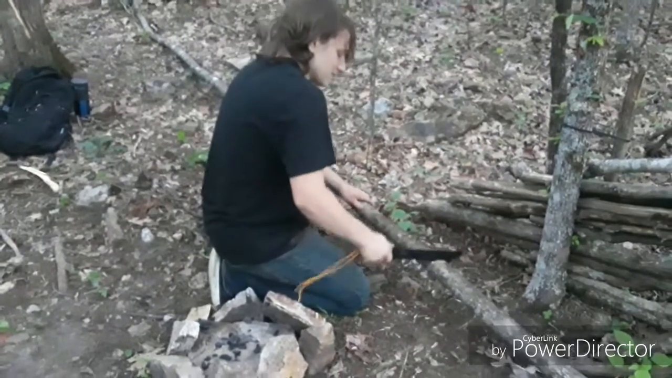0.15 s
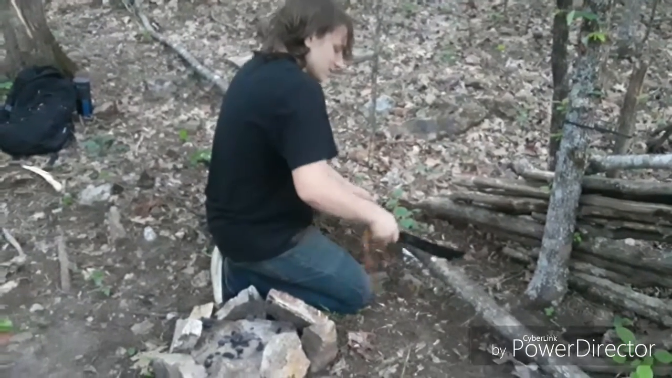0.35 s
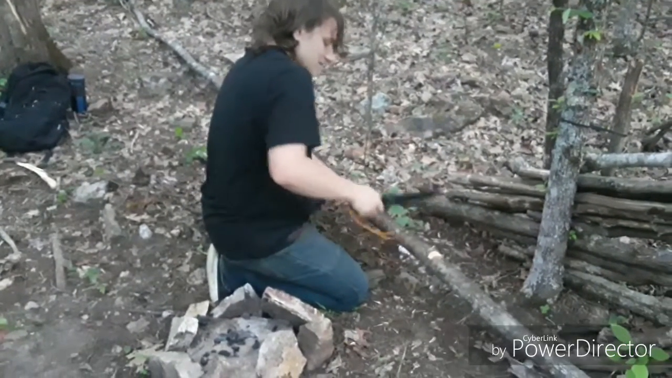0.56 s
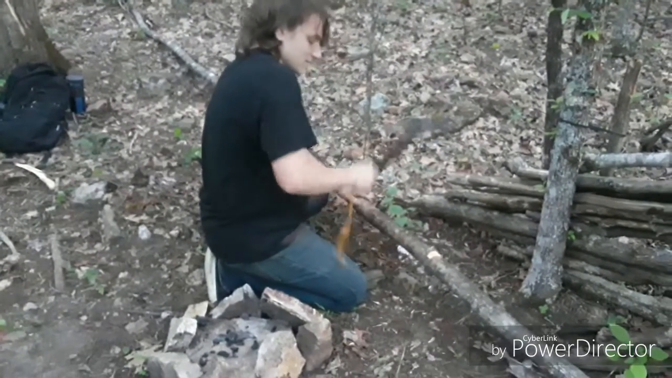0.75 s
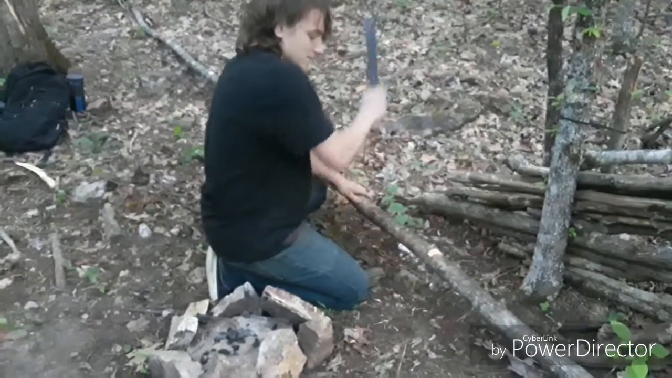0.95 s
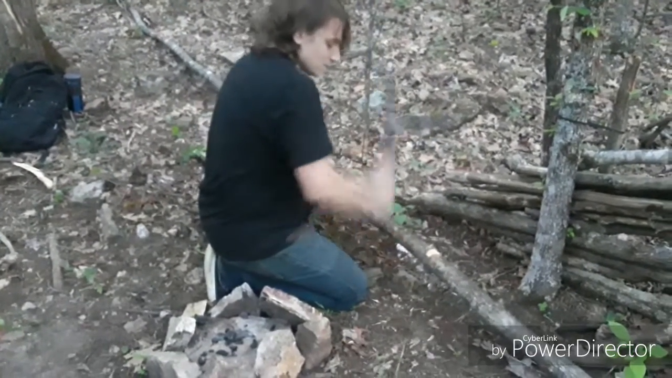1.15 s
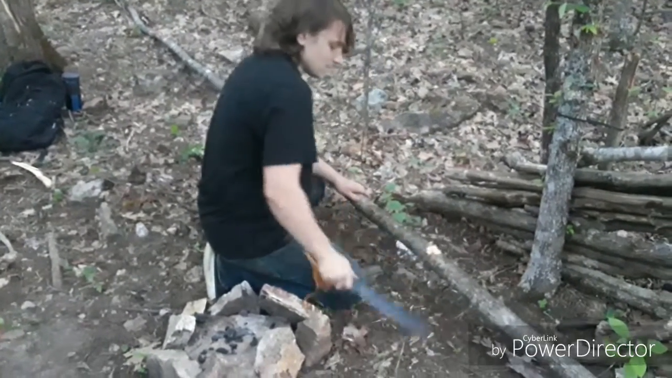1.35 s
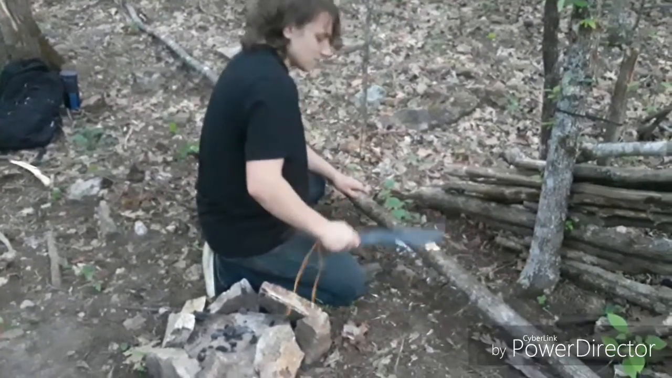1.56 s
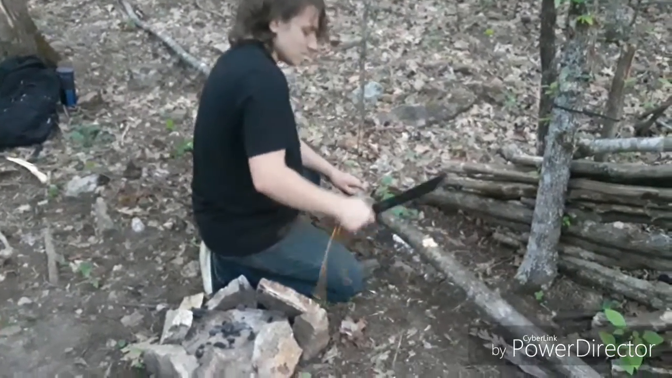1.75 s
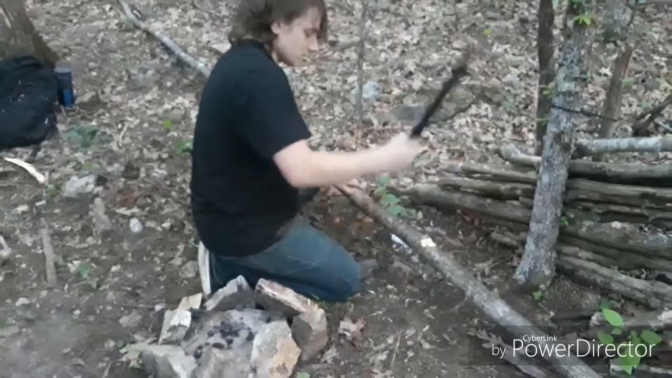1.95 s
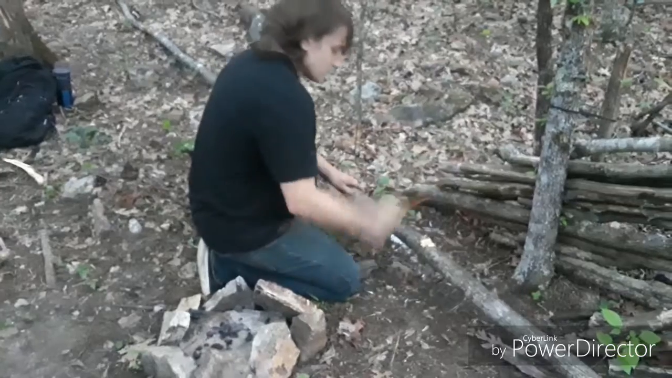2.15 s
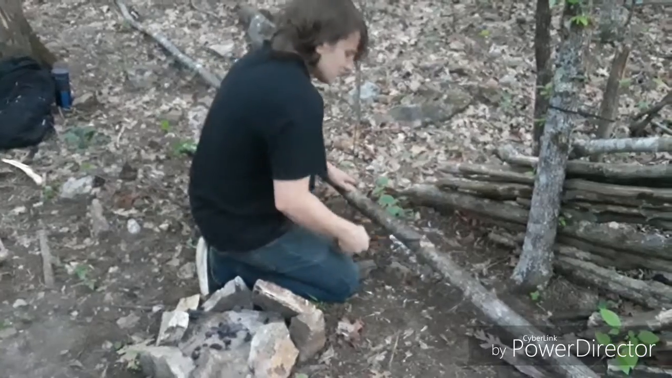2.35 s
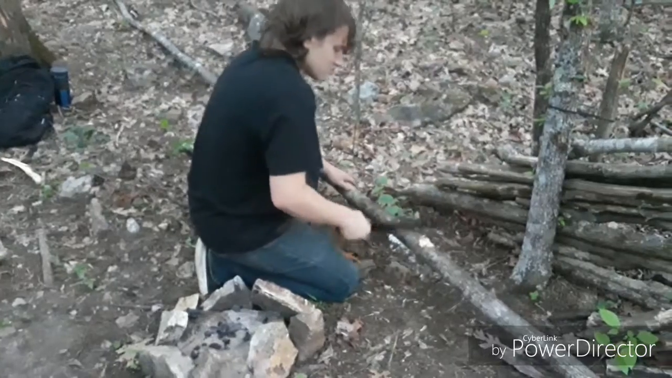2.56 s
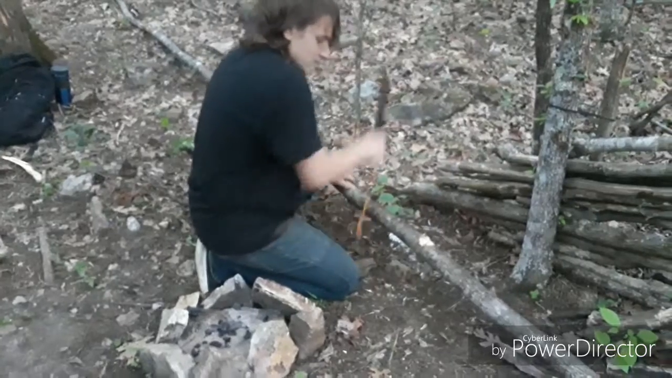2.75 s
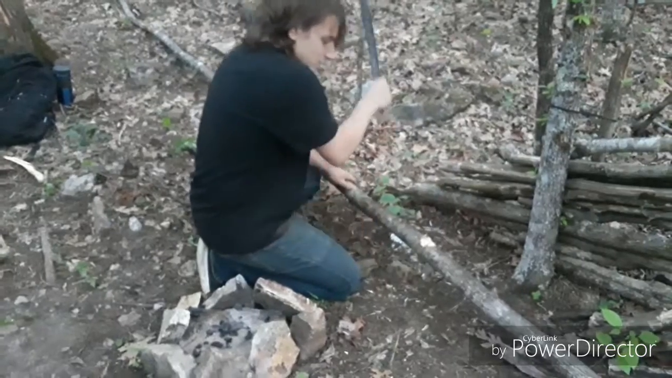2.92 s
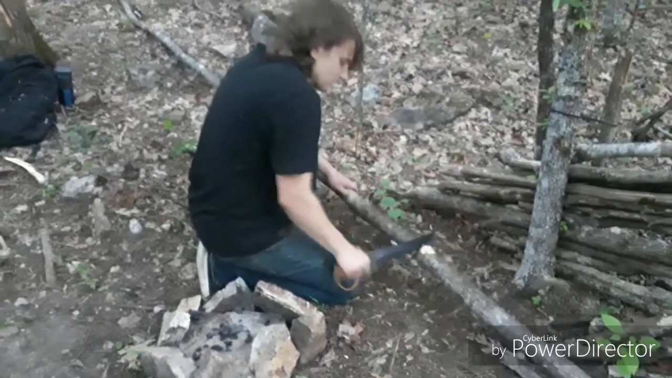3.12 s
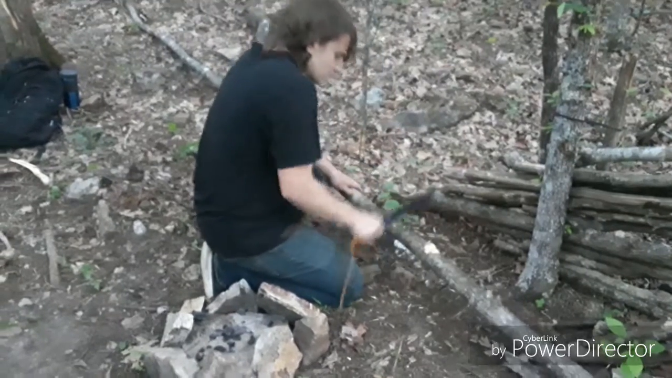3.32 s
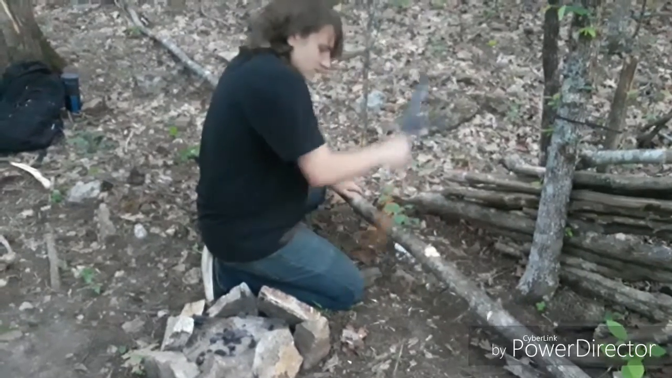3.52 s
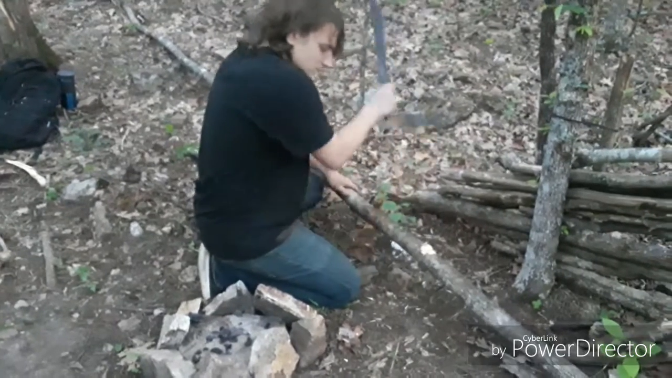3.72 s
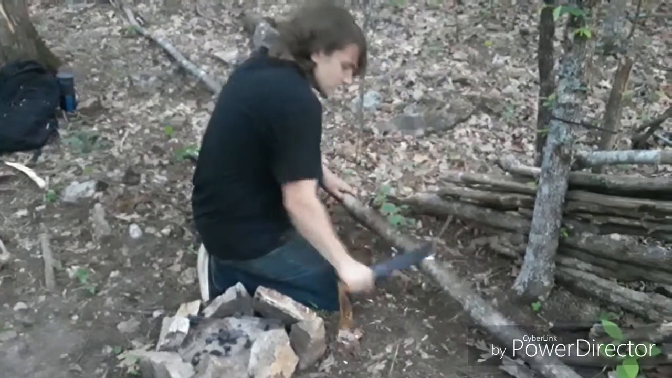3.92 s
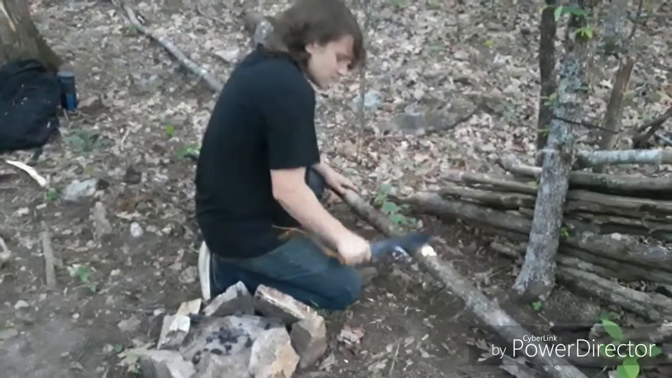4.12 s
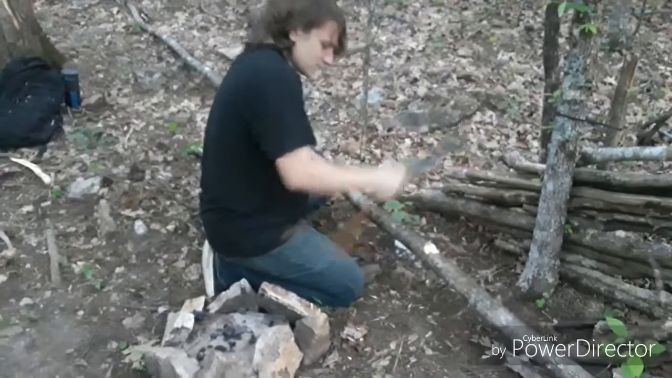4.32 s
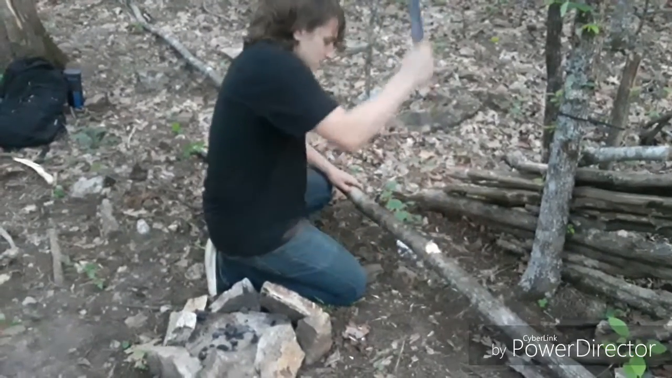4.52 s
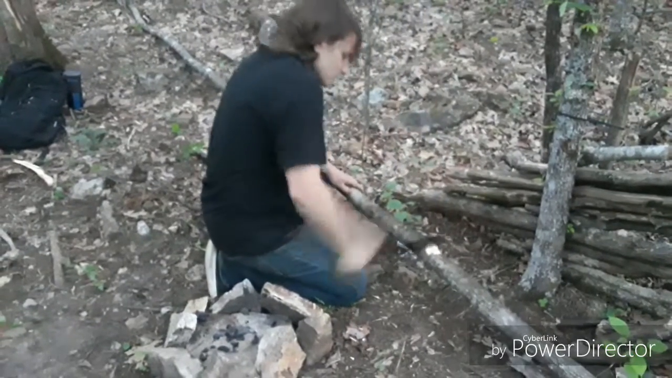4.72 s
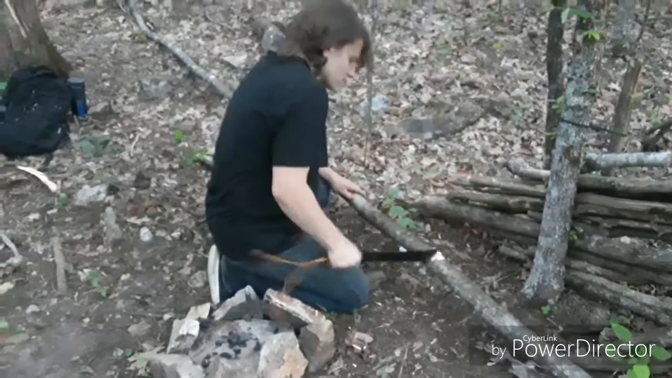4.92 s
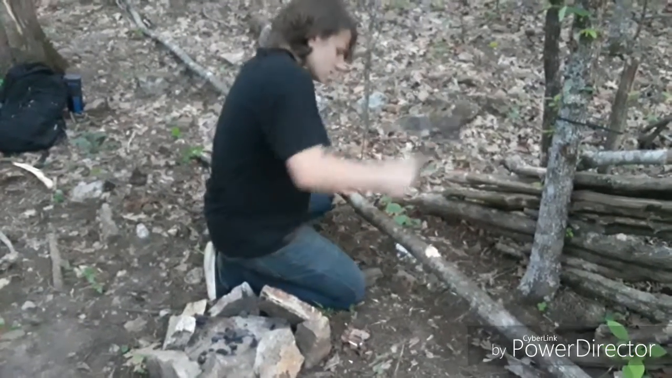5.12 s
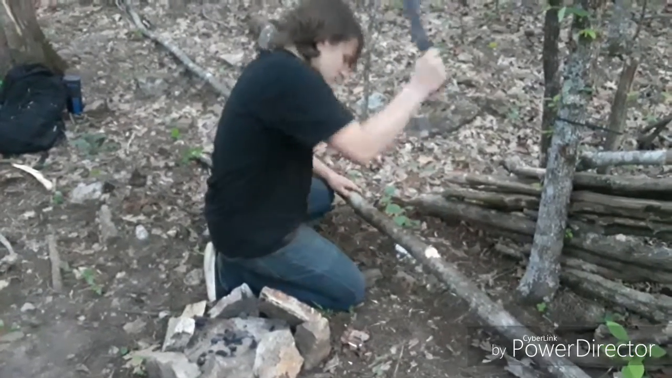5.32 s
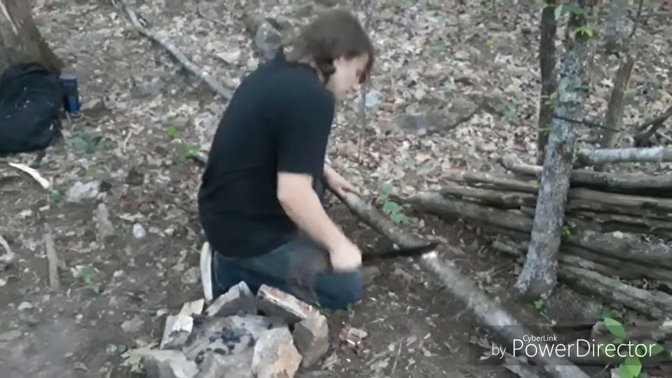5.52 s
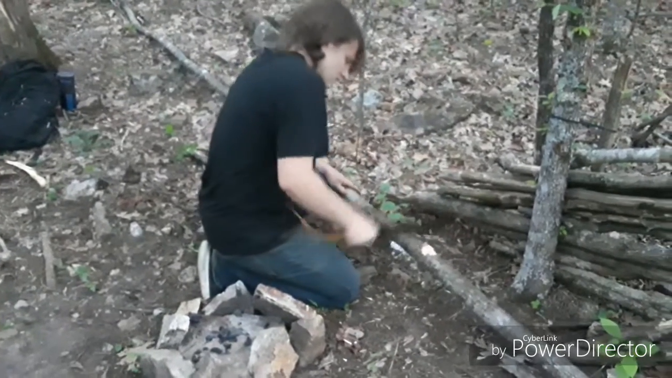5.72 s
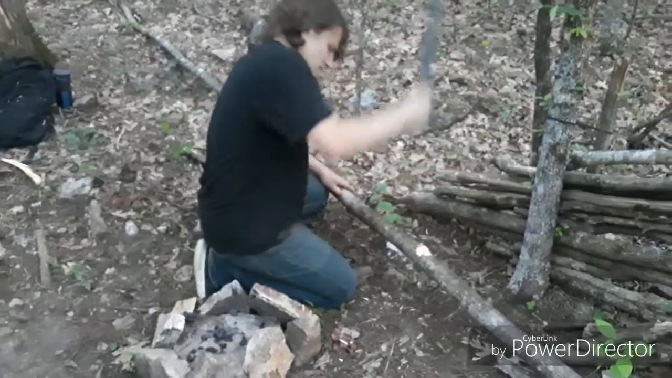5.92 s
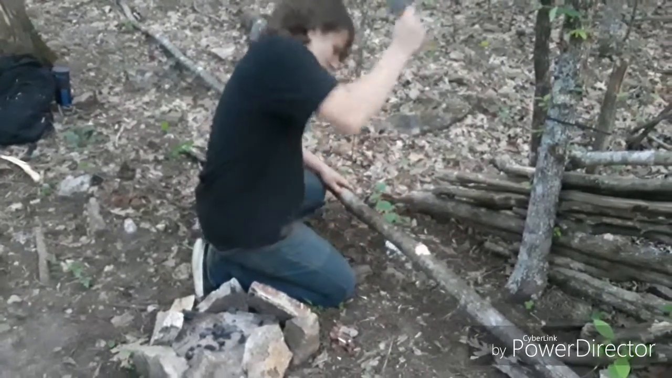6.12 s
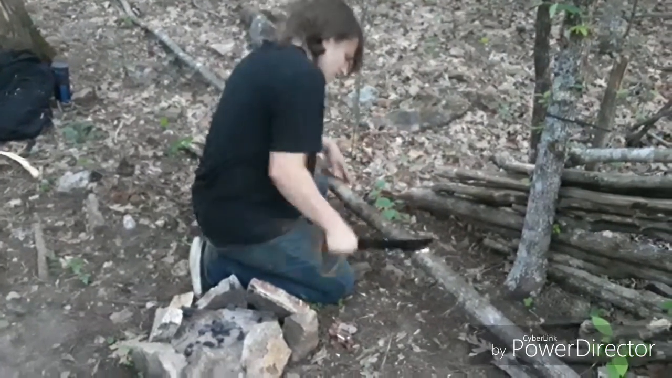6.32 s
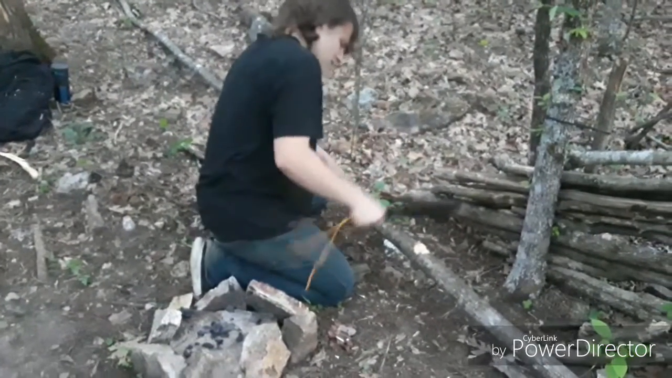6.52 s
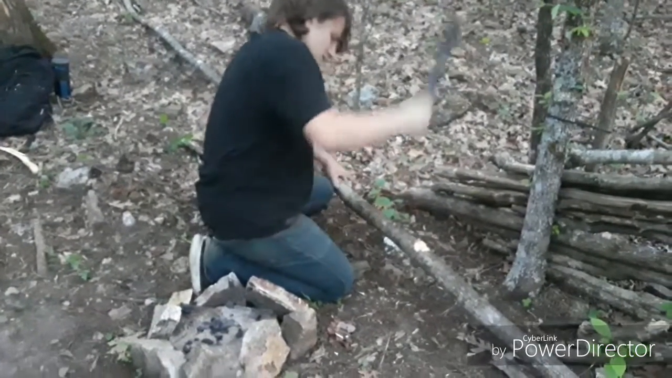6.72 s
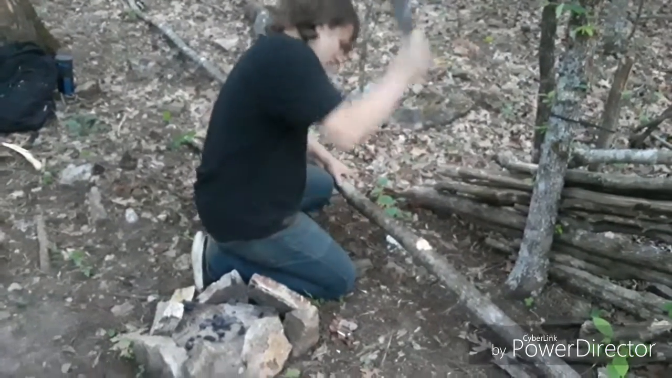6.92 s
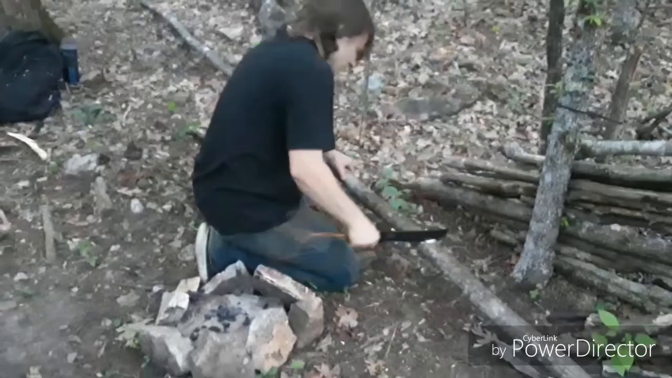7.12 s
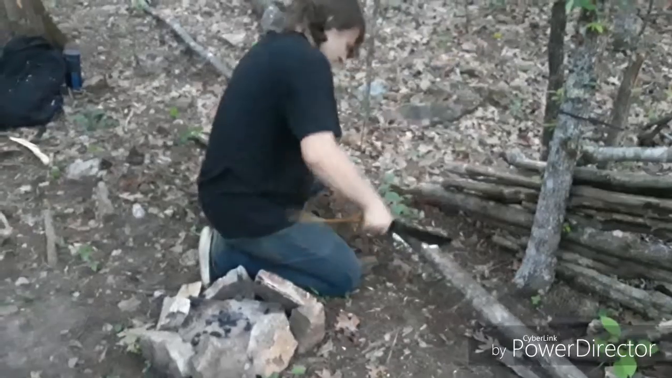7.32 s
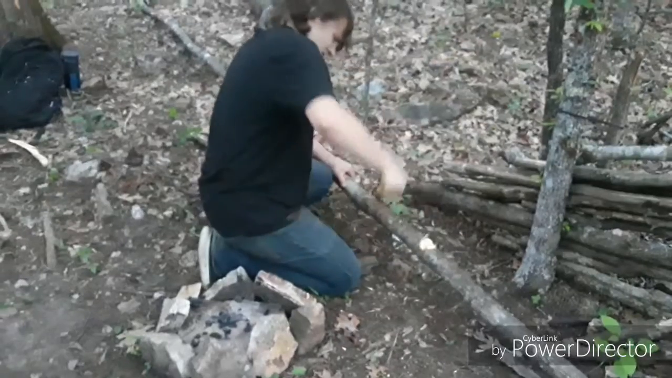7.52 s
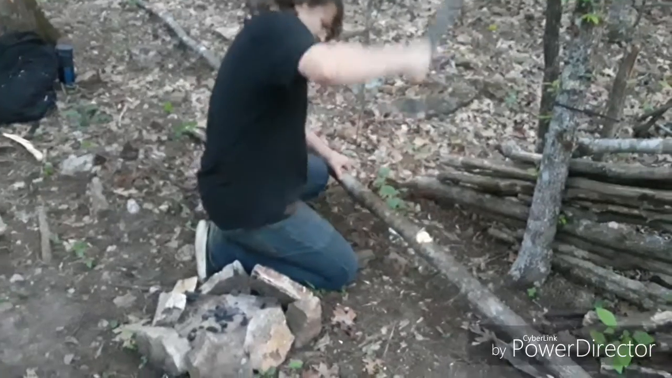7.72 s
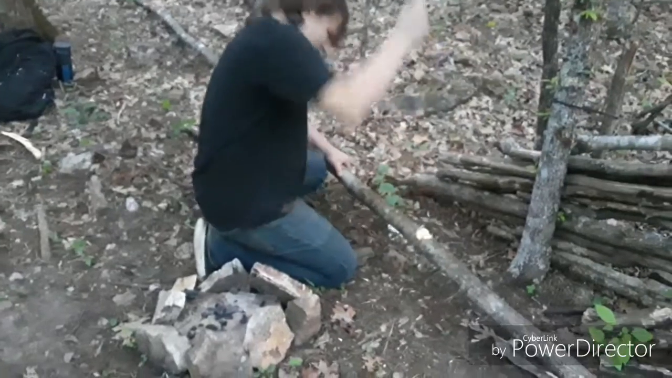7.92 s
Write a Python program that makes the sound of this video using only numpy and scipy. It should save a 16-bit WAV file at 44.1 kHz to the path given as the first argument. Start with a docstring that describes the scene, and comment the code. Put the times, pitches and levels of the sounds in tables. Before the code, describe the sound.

In a wood, close to a stereo microphone, a blade hits a branch in nine steady strokes, each cracking and knocking with a short echo. Some blows also clip twigs or bounce the branch on the ground with a soft thud. Light ticks of falling chips and dry leaves fill the gaps. Far-off traffic hums throughout, with a faint engine rising early on and again around the middle.

```python
"""A machete chops into a fallen branch nine times in a wood. Each impact cracks, excites the damped
modes of the branch and thumps the ground; the trunks scatter the sound back as reverberation.
The blade swishes, clips twigs and at times rings, chips patter down, and dry leaves rustle.
A distant road washes under it all, an engine pulls away twice, and a thin hiss passes near the end.
Two microphone ports a hand apart receive the sound with differences of level and arrival time."""
import sys
import numpy as np
from scipy import signal
from scipy.fft import rfft, irfft, next_fast_len
from scipy.io import wavfile
from scipy.ndimage import uniform_filter1d

SR = 44100
rng = np.random.default_rng(int(sys.argv[2]) if len(sys.argv) > 2 else 0)


def store_wav(level_fs):
    """Save 16-bit WAV to argv[1]."""
    pcm = np.round(np.clip(np.atleast_2d(level_fs), -1, 1) * 32767)
    wavfile.write(sys.argv[1], SR, pcm.T.astype(np.int16))


N = 355710

# start_s, crack_db, knock_db, thump_db, ring_db of six mode groups (low to high),
# bite_ms, held_fraction, debris_db, swish_db, shaken_leaves_db
CHOPS = [(0.069, -13.5, -2.5, -25, -32, -12.5, -19.5, -21, -13, -27, 6.3, 0.69, -28.5, -63, -59.5),
         (1.3333, -9, -10, -43.5, -26.5, -27, -10, -13.5, -18, -27.5, 6, 0.75, -26, -57.5, -48.5),
         (2.3022, -12, 0.5, -32, -46, -30.5, -6, -23.5, -5.5, -33, 6.4, 0.57, -20, -59.5, -53.5),
         (3.2013, -13, -4.5, -23.5, -45.5, -28, -19.5, -19.5, -18.5, -35, 6.5, 0.86, -25.5, -56.5, -53),
         (4.0045, -11, 2.5, -56.5, -48, -20, -20, -19.5, -17.5, -40, 6, 0.76, -32.5, -56, -58),
         (4.8424, -15, -4.5, -24.5, -21.5, -9, -14.5, -11.5, -7, -37, 6.4, 0.87, -23, -47, -57),
         (5.5806, -12.5, -5, -27.5, -29, -19, -33, -11.5, -37, -37, 4.1, 0.67, -32.5, -54.5, -57.5),
         (6.3861, -12.5, -2, -29, -26, -17.5, -22.5, -14, -20, -38, 6, 0.84, -29.5, -50.5, -62.5),
         (7.1439, -14.5, 4.5, -30, -26, -16, -27.5, -15.5, -10.5, -42.5, 6, 0.36, -29.5, -51, -58.5)]
KNOCK_BELOW_HZ, SWISH_S = 2400, .05
THUMP_PAN_DB = 5  # every pan is left level minus right level


def chop(crack_db, knock_db, thump_db, *ring_db, bite_ms, held, debris_db):
    """Impact excitation: one blow drives the wood, the ground, the echo and the debris."""
    t = np.arange(SR // 2) / SR
    crack_noise, echo_noise, debris_noise = rng.standard_normal((3, 2, len(t)))
    crack = edge_crack(t, crack_noise, crack_db, knock_db)
    ring = branch_ring(t, ring_db, bite_ms, held)
    body_db = 0.11 * (ring_db[0] - ring_db[2] + 8.0)  # missing the low modes shakes less ground
    debris = flying_debris(t, debris_noise, debris_db, body_db)
    return crack + ground_thump(t, thump_db) + ring + trunk_echo(echo_noise, ring, crack) + debris


def edge_crack(t, noise, level_db, knock_db):
    """A brief contact has a broad spectrum: a noise burst with a fast and a slower decay."""
    spectrum = [(880, -20.5), (1500, -1.5), (2480, -6), (3380, -25), (4400, -20), (5250, -13),
                (6100, -18.5), (7850, -18), (9890, -31.5), (13500, -16), (15500, -27), (16500, -58)]  # frequency_hz, density_db
    sides = [(1500, -3), (4400, -5.5), (8100, 7), (15000, 7.5)]  # frequency_hz, pan_db
    noise = noise + 0.05 * noise[::-1]
    burst = evened(coloured(noise, lambda hz: read(spectrum, hz) + [[.5], [-.5]] * read(sides, hz)))
    burst = coloured(burst, lambda hz: knock_db * (hz < KNOCK_BELOW_HZ))
    decay = 1.4 * np.exp(-t / 0.0021) + 0.21 * np.exp(-t / 0.014)
    return amp(level_db) * burst * np.minimum(t / 0.00057, 1) * decay


def branch_ring(t, ring_db, bite_ms, held):
    """Modal vibration: a sum of damped sinusoids, the lower ones held back while the edge bites in."""
    modes = [(320, -6, 0.13, 0), (368.3, -1, 0.24, -1.5), (432, -3.5, 0.13, -5), (474, -2.5, 0.15, 0),
             (630, -10.5, 0.031, -2.5), (712, 0, 0.1, -7), (762, -4.5, 0.16, -5), (822, 3.5, 0.077, -3.5),
             (914.6, 1.5, 0.11, -2), (984, -5.5, 0.067, -4.5), (1076, 5, 0.093, -2.5),
             (1171, 1, 0.071, -5.5), (1306, 1, 0.09, -6), (1359, -2.5, 0.052, -8), (1478, 6.5, 0.052, -9),
             (1688, 0.5, 0.062, 0.5), (1818, -8, 0.071, -7), (2052, -6, 0.052, -7), (2470, -7.5, 0.016, -4),
             (2278, -13, 0.021, 3), (2392, -8, 0.04, 1), (2496, -6.5, 0.039, -3), (2800, -18.5, .04, -8),
             (1145, 0, .09, -4.5), (1834, -27.5, 0.33, -4), (4890, -1, 0.032, -5.5), (5190, 5, 0.028, -7),
             (5700, -4.5, 0.023, -4.5), (6700, -4, 0.047, 0), (7730, -4, .04, 3.5)]  # pitch_hz, level_db, t60_s, pan_db
    groups_hz = (420, 900, 1090, 1500, 2200, 5000)  # frequency_hz of each mode group
    hz, db, t60, pan_db = np.transpose(modes)[:, :, None]
    db = db + read(np.c_[groups_hz, ring_db], hz) + 0.85 * rng.standard_normal(hz.shape)
    hz = hz * (1 + .003 * rng.standard_normal(hz.shape))
    phase = 2 * np.pi * (hz * t + rng.random(hz.shape))
    release = 1 - np.clip(held, 0, 1) * (hz < KNOCK_BELOW_HZ) * np.exp(-(1000 * t / bite_ms) ** 2)
    envelope = amp(db - 60 * t / t60) * release * np.minimum(t / 0.00045, 1)
    # torn fibres blur each mode, the high ones and the tails most
    blur = np.clip(np.minimum(hz / 2200, .75) ** 2.2 + t / .1, .3, .9)
    blur *= 1 - .7 * np.exp(-((hz - 1075) / 40) ** 2)  # one mode rings clearer than the rest
    drift = waver(envelope.shape, size=160)
    envelope *= 1 + blur * drift
    phase += 1.2 * blur * drift[::-1]
    left = (envelope * amp(pan_db / 2) * np.sin(phase - .5)).sum(0)
    right = (envelope * amp(-pan_db / 2) * np.sin(phase)).sum(0)
    return highpass(np.array([left, right]), hz=180)  # the ring carries little bass


def ground_thump(t, level_db):
    """Impulse response of the ground: one push and its rebound, then a damped hum."""
    delay_s = np.array([[.0017], [.0002]])  # later at the left port
    u = np.maximum(t - delay_s, 0) / 0.00087
    push = 31.0 * u * (1 - u / 2) * np.exp(-u)
    hum = 0.29 * np.sin(2 * np.pi * 122 * t) * amp(-60 * t / 0.24)
    return amp(level_db) * pan(THUMP_PAN_DB) * (push + hum)


def trunk_echo(noise, ring, crack):
    """Reverberation: the blow is convolved with the diffuse impulse response of the trees."""
    t = np.arange(noise.shape[1]) / SR
    response = tail(noise, stretch=1.8, late_gain=amp(-21)) * np.clip(t / 0.0067 - .3, 0, 1)
    # bright below 2 kHz, dull just above
    response = coloured(response, lambda hz: 1.8 * np.exp(-((hz - 1850) / 280) ** 2)
                        - 3.2 * np.exp(-((hz - 2550) / 400) ** 2))
    response /= np.linalg.norm(response[0])
    blow = coloured(ring, lambda hz: -12 * (hz > KNOCK_BELOW_HZ - 200)) + .9 * crack
    return amp(-20.5) * signal.fftconvolve(blow.mean(0)[None], response, axes=1)[:, :len(t)]


def flying_debris(t, noise, level_db, body_db):
    """Many small impacts merge into decaying noise; splinters crunch in its treble."""
    spectrum = [(35, -32.5), (60, -13.5), (133, -7), (234, -7.5), (342, 1), (600, -10.5), (796, -2.5),
                (1610, -19.5), (2040, -16), (2700, -28), (4000, -31.5), (5000, -27.5), (6000, -31),
                (8960, -35), (14700, -26), (16500, -64)]  # frequency_hz, density_db
    spray = evened(coloured(noise, lambda hz: read(spectrum, hz)))
    spray = coloured(spray, lambda hz: body_db * np.clip(np.log2(1200 / (hz + 1)), 0, 1))
    spray = tail(spray, stretch=0.92)
    splinters = crackly(170., 3., len(t)) * highpass(spray, hz=900, order=1)
    debris = 1.3 * spray + .7 * splinters
    return amp(level_db) * np.minimum(t / 0.0046, 1) * (debris + 0.38 * debris[::-1])


def tail(noise, stretch, late_gain=0, late_t60_s=1.3):
    """Frequency-dependent decay among the trunks; the far ones can add a long, late answer."""
    decay_times = [(100, 0.26), (500, 0.19), (1500, 0.13), (3000, 0.36), (6000, 0.25), (13000, 0.13)]  # frequency_hz, base_t60_s
    hz, t, bands = signal.stft(noise, SR, nperseg=256)
    t60 = stretch * read(decay_times, hz)[:, None]
    fade = amp(-60 * t / t60) + late_gain * amp(-60 * t / late_t60_s)
    return signal.istft(bands * fade, SR, nperseg=256)[1][:, :noise.shape[1]]


def swish(level_db):
    """Aeolian sound: air whistles off the edge, higher and stronger as the blade speeds up."""
    rise = np.linspace(0, 1, round(SWISH_S * SR))
    carrier = np.exp(2j * np.pi * np.cumsum(800 + 650 * rise) / SR)
    noise = uniform_filter1d(rng.standard_normal((2, 2, len(rise))), 90)
    whistle = evened(((noise[0] + 1j * noise[1]) * carrier).real)
    return amp(level_db) * rise ** 1.5 * np.clip(5 * (1 - rise), .3, 1) * whistle


def blade_ring(level_db):
    """Free vibration: the high modes of the steel sing briefly after brushing a twig."""
    modes = [(12220, 0.5, .13), (13390, -0.5, 0.154), (14590, -7.5, .06), (15000, 1, .04)]  # pitch_hz, level_db, t60_s
    t = np.arange(round(0.042 * SR)) / SR  # faded out at 42 ms
    song = 0
    for hz, db, t60 in modes:
        envelope = amp(db - 60 * t / t60) * (1 + .7 * waver(len(t), size=60))
        song += envelope * np.sin(2 * np.pi * (hz * t + rng.random()))
    return amp(level_db) * pan(2.9) * evened(song) * signal.windows.tukey(len(t), .1)


def bounce(level_db, pitch_hz=135, rise_s=.012):
    """A heavily damped oscillation: the branch drops back on the ground with a soft thud."""
    t = np.arange(4000) / SR
    envelope = np.e * t / rise_s * np.exp(-t / rise_s)
    return amp(level_db) * pan(THUMP_PAN_DB) * envelope * np.sin(2 * np.pi * pitch_hz * t - [[.8], [0]])


def twig_or_chip(level_db, crunch_ms, dull_db_per_octave, pan_db):
    """Impact noise, a sharp tick and short crunch: the blade clips a twig, or a chip lands in leaves."""
    spectrum = [(880, -34), (1500, -4.5), (2550, -6.5), (3410, -17.5), (4300, -12.5), (5100, -2.5),
                (6300, -3.5), (7200, -8.5), (8770, -12.5), (9990, -16), (13900, -10), (15700, -27.5),
                (16500, -61.5)]  # frequency_hz, density_db
    t = np.arange(4000) / SR
    noise = rng.standard_normal((2, len(t)))
    tick = np.exp(-t / 0.00061)
    crunch = amp(-9) * np.exp(-(1000 * t / crunch_ms) ** 2)
    burst = coloured(noise + 0.17 * noise[::-1], lambda hz: read(spectrum, hz)
                     + dull_db_per_octave * np.log2(8500 / np.clip(hz, 1500, 15000)))
    return amp(level_db) * pan(pan_db) * evened(burst) * (tick + crunch) * np.minimum(t / 0.0006, 1)


def leaf_litter():
    """Incoherent sources add in power: leaves crackle, shaken by each blow and rustling in between."""
    spectrum = [(1060, -37), (1800, -3.5), (2710, -5), (3780, -6), (4720, -6), (7160, -3.5), (9120, -18.5),
                (11600, -4.5), (13500, -7), (15500, -8), (16500, -47)]  # frequency_hz, density_db
    rustles = [(0.294, 0.044, -87.5), (1.496, 0.52, -70), (2.454, 0.16, -74.5), (3.419, 0.24, -83),
               (4.236, 0.049, -68), (4.425, .3, -77.5), (5.749, 0.9, -79.5), (6.606, 0.61, -84),
               (7.356, 0.61, -80)]  # start_s, length_s, level_db
    hiss = evened(coloured(rng.standard_normal((2, N)), lambda hz: read(spectrum, hz)))
    crackle = .55 + .4 * crackly(90., 3.5, N) + .25 * crackly(25., 3., N, burst_ms=1.5)
    port_flicker = .9 + .14 * crackly(25., 3., (2, N))
    shaken = sum(swell(s, 0, db, rise_s=0.032, fall_db_per_s=84) for s, *_, db in CHOPS)
    rustled = sum(swell(*row, rise_s=0.024, fall_db_per_s=56.5) for row in rustles)
    return evened(hiss * crackle * port_flicker) * np.sqrt(shaken + rustled)


def engine(pull):
    """Engine orders: wavering tones at multiples of the cycle rate, over the roar of the exhaust."""
    orders = [(2.747, -2, -6.5), (4.567, -6.5, -7.5), (5.75, -5, -8.5), (5.9, -3, -7.5), (7.82, -5.5, -2.5),
              (10.23, -8, -1), (11.6, -6, -13), (12.93, -12.5, 0), (14, 2, -12), (16.1, -11.5, 0),
              (16.9, -2, -11.5), (18.33, -7.5, 1), (20.4, -14, 1.5), (26, -16, -9.5)]  # cycle_multiple, cold_db (warmth 0), warm_db (warmth 1)
    exhaust = [(70, -9), (160, -9), (250, -3.5), (340, -8), (430, -2), (530, 0), (660, -1.5), (760, -2.5),
               (1100, -9.5), (2000, -41.5)]  # frequency_hz, level_db
    s, *columns = np.transpose(pull)
    t = np.arange(s[0], s[-1], 1 / SR)
    cycle_hz, load_db, warmth = (np.interp(t, s, column) for column in columns)
    order, cold_db, warm_db = np.transpose(orders)[:, :, None]
    db = cold_db + np.clip(warmth, 0, 1) * (warm_db - cold_db)
    db += 1.5 * waver((len(order), len(t)), size=8000)
    phase = 2 * np.pi * (order * np.cumsum(cycle_hz) / SR + rng.random(order.shape))
    tones = (amp(db) * np.cos(phase)).sum(0)
    roar = coloured(rng.standard_normal((2, len(t))), lambda hz: read(exhaust, hz) - 30 * (hz < 40))
    hz, _, spectra = signal.stft(evened(1.2 * evened(tones) + evened(roar)), SR, nperseg=1024)
    heard = signal.istft(from_road(*spectra, hz), SR, nperseg=1024)[1][:, :len(t)]
    return s[0], heard * amp(load_db) * signal.windows.tukey(len(t), .15)


def road():
    """Broadband traffic noise: rumble and tyre wash swell separately, with drifting spectral patches."""
    spectrum = [(12, -62), (20, -34.5), (53, -5), (128, -1), (265, -13), (305, -14), (342, -16.5),
                (372, -18), (634, -19.5), (1740, -26), (2890, -52.5), (4930, -38), (8890, -50.5),
                (13600, -43.5), (16500, -52)]  # frequency_hz, density_db
    traffic = [(0.0, 1, 11), (1.169, 0.5, 6), (1.4, 13, 19.5), (2.249, 8, 18), (2.5, 2.5, 18.5),
               (3.152, 7.5, 15.5), (3.5, 1.5, 11.5), (4.1, 1, 9.5), (4.75, 10, 23), (5.1, 1, 7.5),
               (6.5, 1.5, 11), (7.45, 0.3, 10.5), (8.07, 5.5, 15)]  # time_s, rumble_gain_db, wash_gain_db
    frames, hz = N // 256 + 5, np.fft.rfftfreq(1024, 1 / SR)
    t = np.arange(frames) * 256 / SR
    a, b, c, d, patches = rng.standard_normal((frames, 513, 5)).T
    patch_db = 1.2 * evened(uniform_filter1d(uniform_filter1d(patches, 6, 0), 12, 1))
    dip_db = 2.0 * np.exp(-((hz - 2600) / 350) ** 2)  # the wash ends steeply above 2 kHz
    colour_db = (read(spectrum, hz) - dip_db)[:, None] + patch_db
    spectra = from_road(a + 1j * b, c + 1j * d, hz) * amp(colour_db)
    s, rumble_db, wash_db = np.transpose(traffic)
    high = np.clip(np.log2(hz / 200 + 1e-9) / 2, 0, 1)[:, None]
    tyre_band = high * (hz < 3000)[:, None]  # the faint hiss above stays steady
    swell_db = (1 - high) * np.interp(t, s, rumble_db) + tyre_band * np.interp(t, s, wash_db)
    resting_rms = np.sqrt(np.mean(signal.istft(spectra, nperseg=1024, noverlap=768)[1] ** 2))
    wash = signal.istft(spectra * amp(swell_db), nperseg=1024, noverlap=768)[1][:, :N]
    return highpass(amp(-64.0) / resting_rms * wash, hz=50)


def from_road(common, other, hz, lead_s=0.00032):
    """Partial coherence: a far sound reaches the left port first, and the ports differ more in treble."""
    coherence = [(60, 0.93), (300, 0.99), (700, 0), (1500, 0.5), (3000, 0.6), (15000, .05)]  # frequency_hz, correlation
    same = np.clip(read(coherence, hz), 0, 1)[:, None]
    early = np.exp(2j * np.pi * hz * lead_s)[:, None]
    left = early * (same * common + np.sqrt(1 - same ** 2) * other)
    return pan(-1.2)[:, :, None] * np.array([left, common])


def thin_hiss(contour):
    """Narrow-band noise near 5 kHz that comes and goes."""
    s, db = np.transpose(contour)
    t = np.arange(s[0], s[-1], 1 / SR)
    band = coloured(rng.standard_normal((2, len(t))), lambda hz: -((hz - 5000) / 230) ** 2)
    return s[0], evened(band) * amp(np.interp(t, s, db)) * signal.windows.tukey(len(t), .2)


def crackly(rate_hz, spread_db, size, burst_ms=5.3):
    """Shot noise: an envelope of rms 1 made of short random bursts of uneven strength."""
    strength = amp(spread_db * np.minimum(rng.exponential(1, size), 5))
    hits = strength * (rng.random(size) < rate_hz / SR)
    return evened(signal.lfilter([1], [1, -np.exp(-1000 / (burst_ms * SR))], hits))


def swell(start_s, length_s, db, rise_s, fall_db_per_s):
    """Power of a stir that rises, holds and decays exponentially."""
    t = np.arange(N) / SR - start_s
    return (np.clip(t / rise_s, 0, 1) * amp(db - fall_db_per_s * np.maximum(t - length_s, 0))) ** 2


def waver(shape, size):
    """Random drift of rms 1: noise smoothed twice over size samples."""
    return evened(uniform_filter1d(uniform_filter1d(rng.standard_normal(shape), size), size))


def amp(db):
    """Decibels to gain."""
    return 10 ** (np.asarray(db) / 20)


def evened(x):
    """Scales to rms 1."""
    return x / np.sqrt(np.mean(x ** 2) + 1e-20)


def read(points, hz):
    """Interpolates a table on a log-frequency axis."""
    f, value = np.transpose(points)
    return np.interp(np.log(hz + 1), np.log(f + 1), value)


def pan(db):
    """Left and right gains for a level difference."""
    return amp(np.array([[db / 2], [-db / 2]]))


def coloured(x, db_of_hz):
    """Filters by a gain curve in dB."""
    size = next_fast_len(x.shape[-1])
    gain = amp(db_of_hz(np.fft.rfftfreq(size, 1 / SR)))
    return irfft(rfft(x, size) * gain, size)[..., :x.shape[-1]]


def highpass(x, hz, order=2):
    """Rolls off below a cutoff."""
    return signal.lfilter(*signal.butter(order, hz, "high", fs=SR), x)


def add(mix, s, sound):
    """Mixes a two-channel sound in at a time."""
    part = mix[:, round(s * SR):][:, :sound.shape[1]]
    part += sound[:, :part.shape[1]]


def scene():
    """Superposition of all sources at the two ports."""
    pulls = [
        [(1.15, 29.58, -51, 0.1), (1.28, 30.22, -55.5, 0.2), (1.6, 30.55, -55, 0), (1.88, 31.14, -53.5, .7),
         (2.1, 31.72, -51, 1), (2.3, 32.37, -46.5, 1), (2.64, 33.21, -54, 0.93), (3.13, 33.87, -57.5, 0.93),
         (3.3, 33.81, -74, 0.9)],
        [(4.1, 27.84, -71, .8), (4.4, 28.51, -55, 0.5), (4.6, 28.46, -52.5, 0.9), (5.0, 29.57, -56, 0.8)],
    ]  # for each pull: time_s, cycle_hz, load_db, warmth_fraction
    hisses = [
        [(7.6, -89), (7.7, -78.5), (7.88, -81.5), (7.95, -94)],
    ]  # for each hiss: time_s, level_db
    ticks = [(0.0094, -46, 6.7, 6.5, -1), (0.033, -55.5, 18, -0.5, 2), (0.11, -22.5, 8.5, 3, 7),
             (0.1238, -16.5, 2.5, 3.5, -4), (0.1277, -23, 8.3, 3.5, -1), (0.2903, -55.5, 7.5, 4, -6),
             (0.717, -62, 4.7, -6, 1), (1.287, -45, 20, 6.5, -2), (1.367, -22, 15, -1.5, 3.5),
             (1.4895, -57, 14, -7, 13), (1.57, -46, 6.5, -7, -2.5), (1.6273, -35.5, 4.9, -15, -7.5),
             (1.711, -40, 27, -4, -3), (1.758, -45.5, 15, 1.5, -3), (1.8625, -63.5, 7, -4, -9.5),
             (1.8862, -57, 9.7, -16, -5), (1.9403, -60, 17, -5, -9), (1.9628, -55, 15, -7, -5),
             (2.0095, -56, 14.7, -4, -10), (2.2847, -59, 9.5, 0.5, 3), (2.5153, -45, 3.9, 3, 3),
             (2.648, -48.5, 16, 7.5, -2), (3.179, -56.5, 9.3, -1, -6), (3.5792, -62, 9.3, 2, -5),
             (3.977, -57, 6.3, 5, -4.5), (3.986, -59, 5.5, -5, 0), (4.037, -38, 3, -13, 4),
             (4.072, -54, 3, 3, 0), (4.109, -63, 4, -1, 0), (4.177, -61, 11.6, -8, 13),
             (4.379, -55, 8.1, 5, -1.5), (4.432, -68, 3, -9, 0), (4.597, -61, 8.8, -5.5, 1.5),
             (4.664, -56, 12, 6, -2), (4.7418, -39.5, 24, -1.5, -5.5), (4.77, -52.5, 41, 3, 0),
             (4.8287, -36.5, 5, 1, -2), (5.387, -62.5, 7.6, -3, 4.5), (5.5188, -52, 7.1, 8.5, -0.5),
             (5.796, -57.5, 7.5, 6, -2.5), (5.977, -64.5, 6, 1.5, -1), (6.05, -65, 8.2, 0, -9.5),
             (6.268, -61.5, 5.2, -3, 0.5), (6.635, -65, 5.3, -2, 1), (6.915, -64, 6, 5, 0),
             (7.0, -68, 41, 6, -3), (7.098, -55, 8.6, 2, -1.5), (7.218, -39.5, 4.1, -5, 8),
             (7.5675, -50.5, 5.6, 0, 2)]  # start_s, level_db, crunch_ms, dull_db_per_octave, pan_db
    bounces = [(1.352, -33.5), (2.345, -35.5), (4.88, -40)]  # start_s, level_db
    brushes = [(.011, -75), (1.29, -47.5), (2.648, -67), (5.519, -81)]  # start_s, level_db
    mix = road() + leaf_litter()
    for pull in pulls:
        add(mix, *engine(pull))
    for contour in hisses:
        add(mix, *thin_hiss(contour))
    for s, *blow, bite_ms, held, debris_db, swish_db, _ in CHOPS:
        add(mix, s - SWISH_S, swish(swish_db))
        add(mix, s, chop(*blow, bite_ms=bite_ms, held=held, debris_db=debris_db))
    for s, *contact in ticks:
        add(mix, s, twig_or_chip(*contact))
    for s, db in bounces:
        add(mix, s, bounce(db))
    for s, db in brushes:
        add(mix, s, blade_ring(db))
    return mix


def record(dry):
    """Bass roll-off, soft saturation near full scale and a band limit at 16.6 kHz."""
    limited = 1.25 * np.tanh(highpass(dry, hz=45) / 1.25)
    lowpass = signal.firwin(1023, 16600, window=("kaiser", 12), fs=SR)
    return signal.oaconvolve(limited, lowpass[None], "same")


dry = scene()
out = record(dry)
store_wav(out)
```